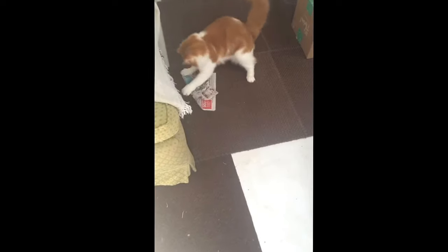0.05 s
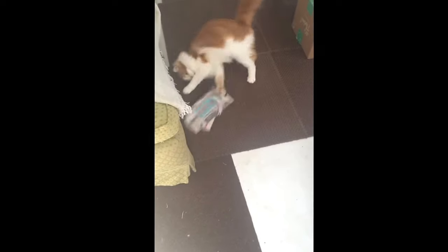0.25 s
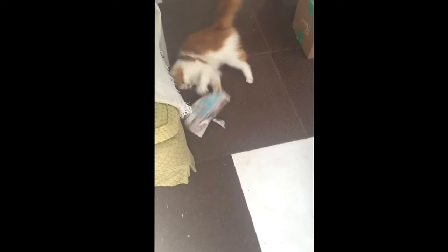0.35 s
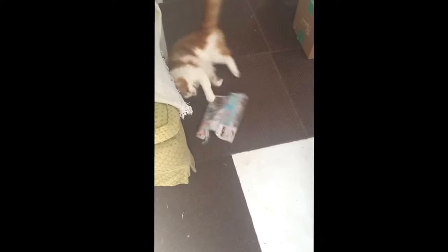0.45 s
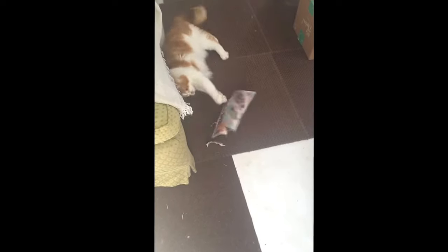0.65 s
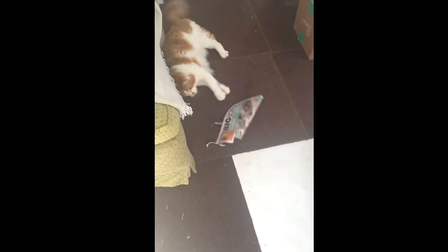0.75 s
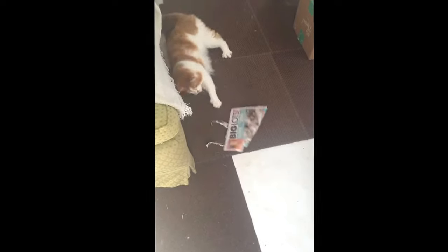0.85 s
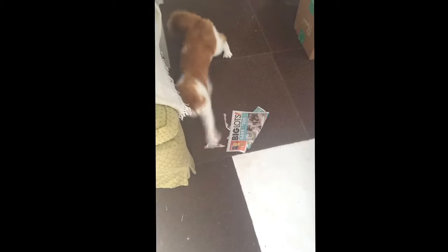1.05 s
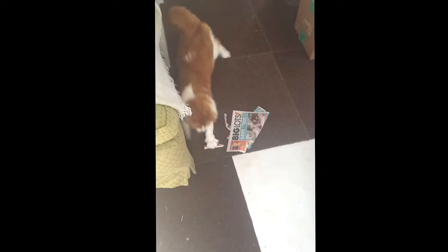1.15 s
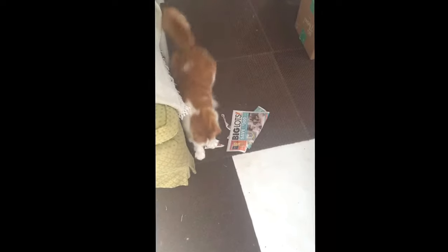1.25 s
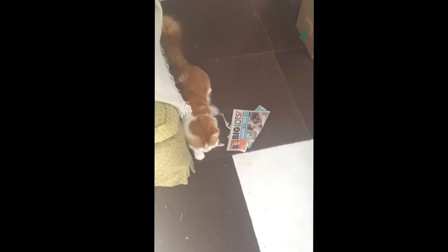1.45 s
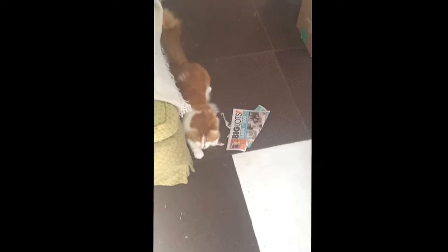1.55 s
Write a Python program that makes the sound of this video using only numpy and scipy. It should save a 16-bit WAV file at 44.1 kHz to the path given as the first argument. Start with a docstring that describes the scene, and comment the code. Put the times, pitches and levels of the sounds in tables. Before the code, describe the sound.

Creased paper swishes, gets batted up with a dull thump, and lands with a sharp slap before sliding across a tiled floor. The cat flicks it again and pads about softly, over the faint rumble of a small room.

```python
"""A small, live room with a tiled floor; one microphone hears a cat swipe a creased paper leaflet about.
The paper swishes and its creases snap; a paw thuds down and bats it up, and at 0.4 s it slaps onto
the tiles and skids. At 1.1 s a claw flicks it once more, and the last soft steps follow.
All along, the paws set the low notes of the room booming over a quiet background rumble."""
import sys
import numpy as np
from scipy import signal
from scipy.fft import rfft, irfft
from scipy.io import wavfile

SR = 44100
rng = np.random.default_rng(int(sys.argv[2]) if len(sys.argv) > 2 else 0)


def generate_wav(sig):
    """Save sig (samples, or channels by samples) to the path in sys.argv[1] as 16-bit PCM at SR."""
    pcm = np.round(np.clip(np.atleast_2d(sig).T, -1, 1) * 32767).astype(np.int16)
    wavfile.write(sys.argv[1], SR, pcm)


N = 70560
T = np.arange(N) / SR
BIN_HZ = np.arange(N // 2 + 1) * SR / N

# Parts of the sheet hit the floor. Each row: start in seconds, crack in dB, air clap in dB.
SHEET_LANDINGS = [(0.3966, -26.5, -22), (0.4016, -31, -31), (0.4031, -29.5, -21.5), (0.405, -38.5, -41),
                  (0.4104, -26.5, -37), (.4130, -28.5, -41), (0.4172, -26.5, -35.5), (.4240, -28, -47)]


def from_db(db):
    """Decibels to gain."""
    return 10 ** (np.asarray(db) / 20)


def rms_one(x):
    """Scale to an rms of 1."""
    return x / np.sqrt(np.mean(x ** 2) + 1e-20)


def at_hz(points, hz):
    """Read a table on a log-frequency axis."""
    f, value = np.transpose(points)
    return np.interp(np.log(hz + 1e-3), np.log(f), value)


def colour(x, spectrum):
    """Give a steady noise a spectrum; rms 1."""
    return rms_one(irfft(rfft(x) * from_db(at_hz(spectrum, BIN_HZ)), N))


def add(out, start, x):
    """Mix a sound in from a start in seconds."""
    i = max(int(start * SR), 0)
    out[i:i + len(x)] += x[:N - i]


def ring(hz, t60):
    """A struck mode that falls 60 dB in t60 seconds."""
    return np.sin(2 * np.pi * hz * T) * from_db(-60 * T / t60)


def resonate(x, hz, width_hz):
    """A resonance with gain 1 at its centre."""
    w = 2 * np.pi * min(hz, SR / 2 - 1) / SR
    a = np.sin(w) * abs(width_hz) / (2 * hz)
    return signal.lfilter([a, 0, -a], [1 + a, -2 * np.cos(w), 1 - a], x + 1e-18)


def stroke(crest, rise, fall):
    """The level of a movement that gathers speed and slows again."""
    return np.exp(-((T - crest) / np.where(T < crest, rise, fall)) ** 2)


def fibre_grains(per_second=14000, spread_db=3.5):
    """Fibres catch and slip: dense clicks of uneven size."""
    sizes = from_db(spread_db * np.minimum(rng.exponential(1, N), 5))
    signs = rng.choice([-1, 1], N)
    return sizes * signs * (rng.random(N) < per_second / SR)


def crease_snaps(crumble_db=-17, crumble_s=0.0016):
    """Creases snap, claws and edges tick: a click, then fibres giving way, ringing in a paper facet."""
    # Each row: start in seconds, click peak in dB, centre in Hz, width as a share of the centre.
    snaps = [(.0082, -36, 3430, 2), (0.018, -34, 2310, 1.66), (0.0232, -37, 4860, 5),
             (0.0606, -43.5, 9600, 0.56), (0.138, -42, 5870, 0.88), (0.1617, -33, 4000, 0.82),
             (.2100, -28.5, 9900, 0.4), (0.3138, -32, 3860, 0.42), (0.355, -37, 5570, 1.1),
             (0.4052, -16, 9300, 0.87), (0.522, -38, 3200, 1.1), (0.5505, -36, 2850, 0.76),
             (0.649, -26, 2080, 0.33), (0.648, -41, 5500, 1.2), (0.6646, -24, 4500, 1.02),
             (1.0858, -31, 4120, 1.06), (1.091, -22.5, 5790, 0.73), (1.0902, -30, 2080, 0.76),
             (1.0927, -27.5, 5970, 3.1), (1.0944, -24.5, 7100, 0.41), (1.1085, -34, 6040, 1.1),
             (1.508, -52, 4010, 2.9)]
    out, t = np.zeros(N), T[:SR // 20]
    for start, db, hz, width in snaps:
        fibres = from_db(crumble_db) * rng.standard_normal(len(t)) * np.exp(-t / crumble_s) * (t > 1 / hz)
        click, crumble = (resonate(resonate(push, hz, hz * width), hz, hz * width * 2)
                          for push in (1.0 * (t == 0), fibres))
        add(out, start, from_db(db) * (click + crumble) / np.abs(click).max())
    return out


def sheet_slap(rise_s=0.00035, decay_s=0.0028, clap_hz=945):
    """The sheet lands part by part, each with a crack and a clap of trapped air."""
    # The tone of the crack. Each row: frequency in Hz, level in dB.
    crack_spectrum = [(300, -6), (550, -15), (850, 2.5), (2000, 1.5), (4000, 2.5), (6500, 0.5),
                      (11000, -6.5), (15500, -7.5)]
    envelope = np.exp(-T / decay_s) * (1 - np.exp(-T / rise_s))
    out = np.zeros(N)
    for start, crack_db, clap_db in SHEET_LANDINGS:
        crack = colour(rng.standard_normal(N), crack_spectrum) * envelope
        clap = ring(clap_hz * rng.uniform(.85, 1.2), t60=0.0039)
        add(out, start, from_db(crack_db) * crack + from_db(clap_db) * clap)
    return out


def sheet_ring(build_s=0.0068):
    """The sheet and the air under it ring, hollow and brief, after the slap."""
    # Each row: frequency in Hz, level in dB, seconds to fall 60 dB.
    sheet_modes = [(401.3, -40.5, 0.17), (728.3, -28, 0.11), (952, -31.5, 0.16), (1070, -37.5, 0.13),
                   (1217, -31, 0.15), (1464, -41, 0.26), (1537, -43, 0.2), (1720, -37, 0.18),
                   (1880, -39, 0.25), (2340, -35.5, 0.17), (2480, -45, 0.34), (2776, -54, 0.15),
                   (3794, -44, 0.21)]
    out, touchdown = np.zeros(N), SHEET_LANDINGS[0][0]
    build_up = 1 - np.exp(-T / build_s)
    for hz, db, t60 in sheet_modes:
        add(out, touchdown + rng.uniform(0, .003), from_db(db) * ring(hz, t60) * build_up)
    return out


def paper_swishes():
    """Paper brushes past fur and paper with a bright, fine friction."""
    # Each row: crest time, rise and fall in seconds, rms at the crest in dB.
    swishes = [(0.017, 0.1, 0.0055, -59.5), (.213, 0.058, 0.038, -45), (.295, 0.022, 0.097, -53.5),
               (0.416, 0.01, 0.055, -46.5), (.69, 0.07, 0.041, -62), (.93, 0.13, 0.083, -66),
               (1.09, 0.0045, 0.0034, -45), (1.26, 0.067, 0.067, -69), (1.59, 0.14, 0.065, -67.5)]
    # The tone of the brushing. Each row: frequency in Hz, level in dB.
    swish_spectrum = [(300, -3), (800, -14), (1400, 10.5), (2800, 7), (6000, 7.5), (9500, 5), (15500, 4)]
    envelope = sum(from_db(db) * stroke(crest, rise, fall) for crest, rise, fall, db in swishes)
    return colour(fibre_grains(), swish_spectrum) * envelope


def tile_skids(crackles_per_s=300, crackle_db=-9.5, resonance_db=5):
    """Paper and paws rub the tiles as small creases give way; the bending sheet retunes each skid."""
    # Each row: crest time, rise and fall in seconds, rms at the crest in dB, resonance in Hz.
    skids = [(0.025, 0.02, 0.047, -54.5, 1820), (.11, 0.055, 0.17, -66.5, 720),
             (0.235, 0.035, 0.043, -51.5, 1380), (0.292, 0.006, 0.015, -45, 970),
             (0.326, 0.019, 0.039, -44.5, 664), (0.436, 0.035, 0.049, -39.5, 1750),
             (0.522, 0.027, 0.06, -44, 1110), (0.599, 0.0098, 0.03, -50, 2930),
             (0.647, 0.017, 0.015, -48, 760), (0.675, 0.0074, 0.0088, -44.5, 2540),
             (0.734, 0.22, 0.063, -59, 1540), (0.927, 0.069, 0.045, -63, 1400),
             (1.008, 0.01, 0.021, -61.5, 1290), (1.102, 0.0093, 0.0064, -48.5, 2130),
             (1.27, 0.32, 0.1, -71.5, 1650)]
    # The duller tone of the rubbing. Each row: frequency in Hz, level in dB.
    skid_spectrum = [(150, 0), (280, -4), (480, -1), (700, 4), (2500, -0.5), (5000, -6), (9000, -15.5),
                     (15500, -20)]
    out = np.zeros(N)
    for crest, rise, fall, db, hz in skids:
        crackle = rms_one(rng.standard_normal(N) * (rng.random(N) < crackles_per_s / SR))
        rub = colour(rms_one(fibre_grains()) + from_db(crackle_db) * crackle, skid_spectrum)
        resonance = from_db(resonance_db) * resonate(rub, hz, hz * .5)
        out += from_db(db) * stroke(crest, rise, fall) * rms_one(rub + resonance)
    return out


def floor_knocks(half_length_cycles=0.49, ring_db=-18.5, ring_pitch_ratio=0.78):
    """Paws and folds knock on the floor: a push of about one cycle, then the sheet rings faintly."""
    # Each row: time in seconds, peak in dB, centre in Hz.
    knocks = [(.3140, -19.5, 1770), (.3472, -30.5, 800), (0.5508, -35.5, 1100), (.6435, -37.5, 1010),
              (1.007, -46, 1090), (1.393, -55, 1550)]
    out = np.zeros(N)
    for time, db, hz in knocks:
        cycles = T * hz - 1
        push = np.cos(2 * np.pi * cycles) * np.exp(-(cycles / half_length_cycles) ** 2)
        add(out, time - 1 / hz, from_db(db) * push)
        add(out, time, from_db(db + ring_db) * ring(hz * ring_pitch_ratio, t60=0.027))
    return out


def paw_thuds(pat_db=-6, pat_s=0.024, rise_s=0.0019, mode_spread_db=2.94):
    """Each paw lands with a dull pat of the pad and a boom in the room's low modes."""
    # Each row: start in seconds, level in dB.
    steps = [(.005, -56), (0.066, -57.5), (.3150, -27.5), (0.3455, -38.5), (0.401, -51), (0.453, -43),
             (0.523, -51), (0.576, -48), (0.711, -50.5), (0.876, -51), (1.005, -52), (1.098, -41),
             (1.128, -47.5), (1.168, -50), (1.257, -48.5), (1.279, -46.5), (1.2934, -43), (1.369, -55),
             (1.461, -55), (1.521, -59.5)]
    # Each row: frequency in Hz, level in dB relative to the step, seconds to fall 60 dB.
    room_modes = [(58.5, -6.5, 0.35), (91, -14.5, 0.2), (106.4, -3.5, 0.068), (138.8, -8, 0.2),
                  (219.4, -15.5, 0.29), (320.4, -22.5, 0.29)]
    # The tone of the pat. Each row: frequency in Hz, level in dB.
    pad_spectrum = [(20, -8), (50, -0.5), (80, 6), (180, 0), (250, -10.5), (400, -13.5), (900, -35),
                    (4000, -66)]
    out = np.zeros(N)
    for start, db in steps:
        boom = sum(from_db(mode_db + rng.normal(0, mode_spread_db)) * (-1) ** k * ring(hz, t60)
                   for k, (hz, mode_db, t60) in enumerate(room_modes))
        pat = from_db(pat_db) * colour(rng.standard_normal(N), pad_spectrum) * np.exp(-T / pat_s)
        add(out, start, from_db(db) * (boom + pat) * (1 - np.exp(-T / rise_s)))
    return out


def room_echoes(x, level_db=-9, first_echo_s=.006, early_db=6.5, early_s=0.048):
    """Near walls send the microphone dense early echoes, then a tail whose midrange lasts longest."""
    # The decay of the room. Each row: frequency in Hz, seconds to fall 60 dB.
    decay_times = [(200, 0.26), (1500, 0.53), (4000, 0.44), (8000, 0.32), (15000, 0.31)]
    # The tone of the echoes. Each row: frequency in Hz, level in dB.
    echo_spectrum = [(100, 12), (500, 7.5), (1500, 4.5), (5000, 0.5), (9000, -2), (15000, -1)]
    edges_hz, tail = np.geomspace(200, 16000, 22), np.zeros(N)
    noise_bins = rfft(colour(rng.standard_normal(N), echo_spectrum))
    for low, high in zip(edges_hz, edges_hz[1:]):
        band = irfft(noise_bins * ((BIN_HZ >= low) & (BIN_HZ < high)), N)
        tail += band * from_db(-60 * T / at_hz(decay_times, np.sqrt(low * high)))
    tail *= (T > first_echo_s) * from_db(early_db * np.exp(-T / early_s))
    return from_db(level_db) * signal.fftconvolve(x, tail / np.sqrt(np.sum(tail ** 2)))[:N]


def room_tone(rms_db=-66):
    """A quiet, steady rumble with a trace of hiss."""
    # Each row: frequency in Hz, level in dB.
    rumble_spectrum = [(20, -19), (40, -6.5), (60, 8.5), (90, 1.5), (180, 0), (300, -4), (700, -9.5),
                       (2000, -23.5), (6000, -25.5), (15000, -32.5)]
    return from_db(rms_db) * colour(rng.standard_normal(N), rumble_spectrum)


def scene(slap_send_db=0.5, friction_send_db=-7):
    """Paper and paws at the microphone, with the room's echoes and the room tone behind them."""
    ticks = crease_snaps() + floor_knocks()
    slap = sheet_slap()
    friction = paper_swishes() + tile_skids()
    echoes = room_echoes(ticks + from_db(slap_send_db) * slap + from_db(friction_send_db) * friction)
    background = room_tone()
    return (ticks + slap + sheet_ring() + friction + echoes + paw_thuds() + background)[None]


def record(dry):
    """A steep low-pass takes off the top treble, 70 dB down from 16250 Hz."""
    return signal.sosfilt(signal.cheby2(14, 70, 16250, fs=SR, output="sos"), dry)


dry = scene()
out = record(dry)
generate_wav(out)
```